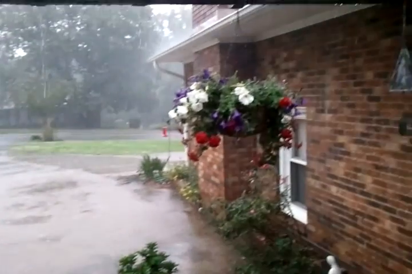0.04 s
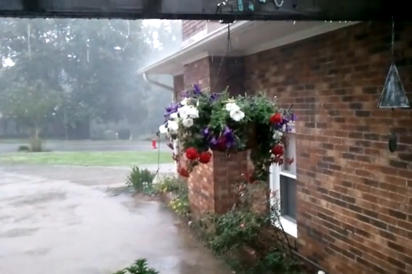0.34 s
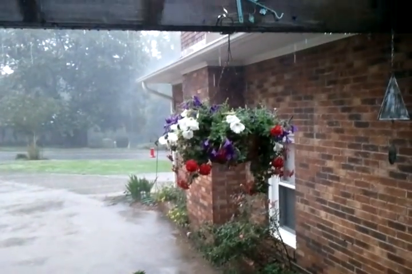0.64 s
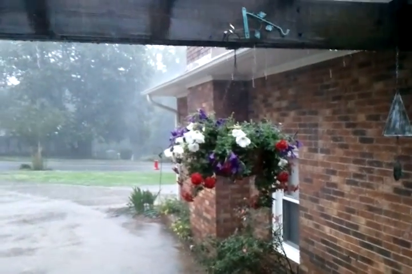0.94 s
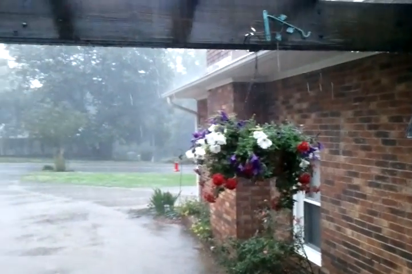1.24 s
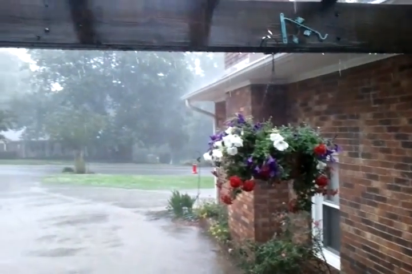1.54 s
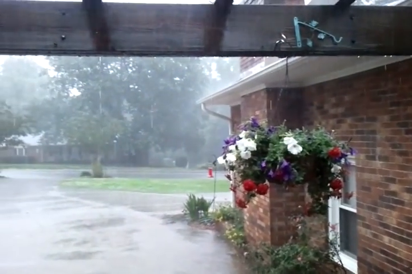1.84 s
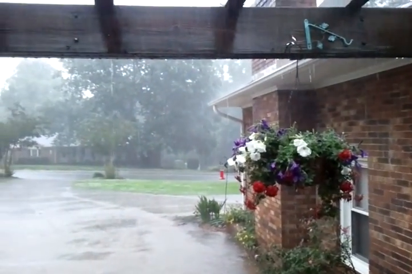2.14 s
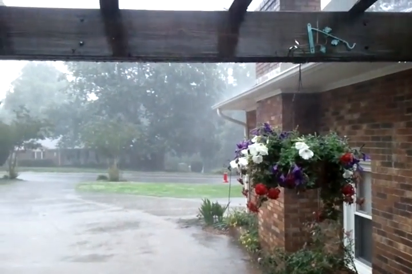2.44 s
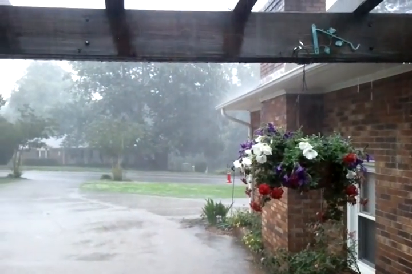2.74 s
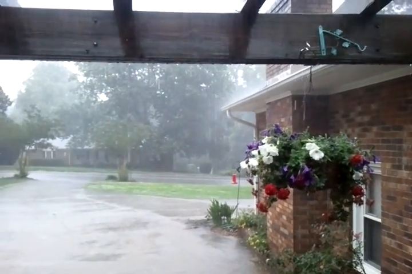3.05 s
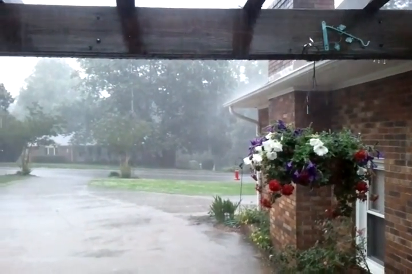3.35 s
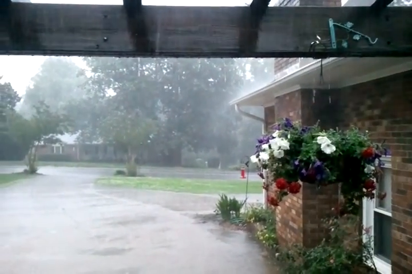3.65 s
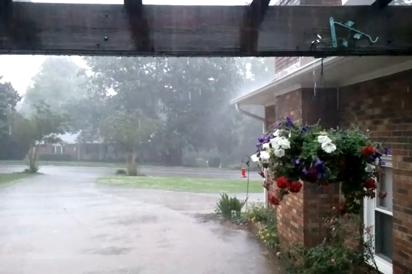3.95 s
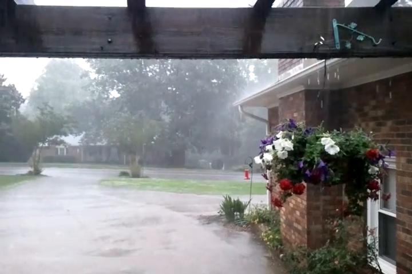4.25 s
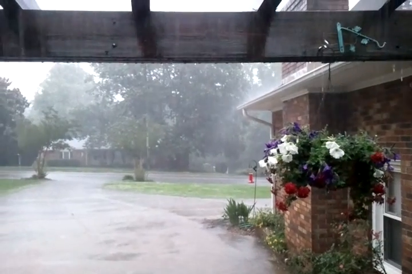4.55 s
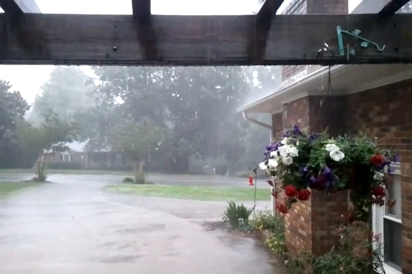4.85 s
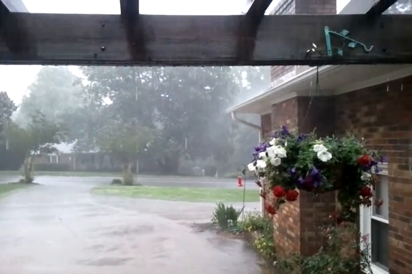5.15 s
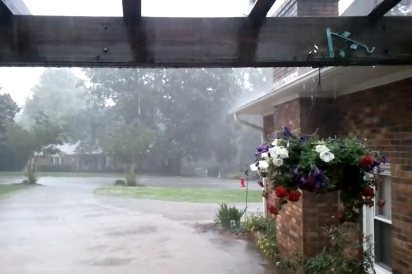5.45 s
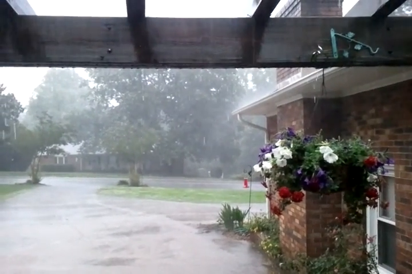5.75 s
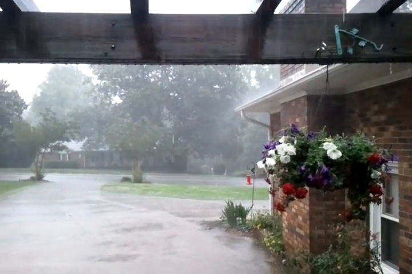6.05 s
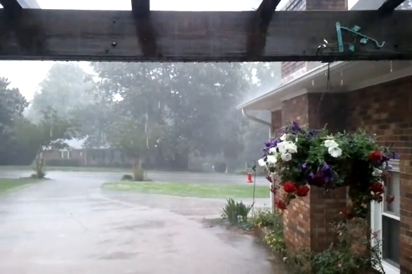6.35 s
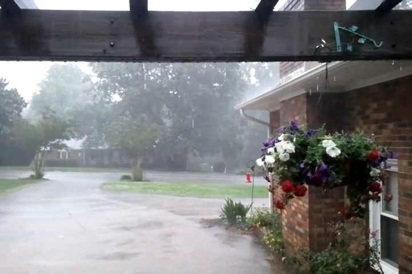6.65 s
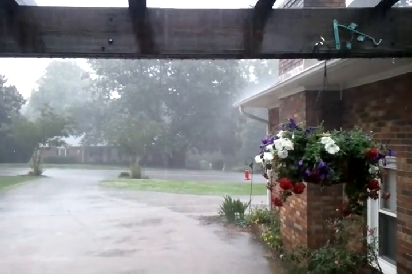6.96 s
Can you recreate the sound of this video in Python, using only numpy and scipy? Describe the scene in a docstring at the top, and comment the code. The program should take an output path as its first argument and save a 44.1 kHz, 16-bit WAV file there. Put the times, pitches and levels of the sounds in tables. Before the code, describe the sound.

Heavy rain pours on a driveway while long, deep thunder rolls swell and fade, and roof water splats close by.

```python
"""Thunder and heavy rain

Long thunder rolls swell and fade, heard from a porch beside a brick house; the porch booms along.
Water from the roof edge splats on the paving, near drops patter, and far ones merge into a wash
over the driveway and yard. The recorder's limiter turns the rain down under the biggest peals."""
import sys
import numpy as np
from scipy.fft import rfft, irfft, next_fast_len
from scipy.io import wavfile
from scipy.ndimage import uniform_filter1d, minimum_filter1d, map_coordinates

SR = 44100
rng = np.random.default_rng(int(sys.argv[2]) if len(sys.argv) > 2 else 0)


def unload_wav(signal):
    """Save mono or channel-first audio to the path in sys.argv[1] as 16-bit WAV at rate SR, clipped to [-1, 1]."""
    wavfile.write(
        sys.argv[1],
        SR,
        np.round(np.clip(np.atleast_2d(signal).T, -1, 1) * 32767).astype(np.int16),
    )


N = 318402

# Peals of thunder: (start [s], length [s], boom [dB], growl [dB], grumble [dB], porch drone [dB])
PEALS = [(-.06, .061, -11.5, -18, -15.5, -37), (0.088, 0.09, -34.5, -34, -24, -34),
         (0.324, .1, -20.5, -16, -21, -20), (0.415, 0.099, -28.5, -17, -20, -32),
         (0.598, .09, -25, -21, -23, -20.5), (0.74, 0.072, -23, -25, -40, -37),
         (1.17, 0.23, -27.5, -42, -41, -34), (1.443, 0.17, -23.5, -30.5, -30.5, -17),
         (1.557, 0.096, -17.5, -18.5, -22, -16), (1.719, 0.31, -16.5, -16, -19, -10),
         (2.068, .36, -16, -17.5, -21.5, -14), (2.504, .45, -15.5, -22, -25, -23),
         (2.82, 0.13, -17.5, -22.5, -29, -15), (2.975, .076, -20, -20.5, -35, -28),
         (3.107, .36, -19.5, -23, -28.5, -26), (3.54, .08, -16, -25.5, -33, -32),
         (3.646, .12, -22, -19.5, -23, -22.5), (3.834, 0.09, -16.5, -26, -26.5, -29),
         (3.998, 0.18, -20.5, -26, -40, -24), (4.298, .33, -26, -44, -33, -29.5),
         (4.996, 0.13, -21.5, -30, -36.5, -23.5), (5.144, 0.13, -19.5, -20.5, -26.5, -20),
         (5.234, .09, -17.5, -27, -30, -18.5), (5.337, 0.087, -12, -27.5, -20.5, -18),
         (5.495, .34, -17, -24.5, -25, -17), (5.919, 0.1, -13, -32, -30.5, -27),
         (6.17, 0.2, -21.5, -32, -32.5, -22.5), (6.504, .18, -17, -21.5, -24, -25.5),
         (6.617, 0.27, -19.5, -23, -28, -26.5), (6.8, .23, -19, -22, -24.5, -22.5),
         (7.064, .12, -11.5, -19, -17, -16)]
# The tone of three layers of thunder, from low to high: (frequency [Hz], level [dB])
BOOM_TONE = [(38, -31), (50, -14), (60, -10), (82, -3.5), (96, -1.5), (112, -20), (200, -43.5)]
GROWL_TONE = [(70, -26.5), (112, -7.5), (130, 5.5), (175, 1), (210, -8.5), (300, -18), (900, -54.5)]
GRUMBLE_TONE = [(130, -20), (195, 2), (240, 2), (300, -3.5), (400, -11), (550, -21.5), (900, -40.5),
                (2000, -72)]
def thunder_peals(drone_hz=107.2):
    """Crowds of shock waves from the lightning, dulled by distance, make the porch ring."""
    starts, lengths, boom_db, growl_db, grumble_db, drone_db = np.transpose(PEALS)
    boom = unit(coloured(shocks(), BOOM_TONE))
    porch_boom = unit(resonance(boom, hz=65.5, width_hz=9))
    boom = steadied(boom + amp(1.0) * porch_boom, span_s=0.066)
    # the porch's sharpest note rings so long that it is almost a pure tone
    drone = resonance(shocks(), drone_hz, width_hz=2.5)
    drone = steadied(resonance(drone, drone_hz, width_hz=4.6), span_s=0.1)
    growl = steadied(porch(coloured(shocks(), GROWL_TONE)), span_s=0.054)
    # nearer branches of the lightning keep more of their upper bass
    grumble = steadied(porch(coloured(shocks(), GRUMBLE_TONE)), span_s=0.15)
    # the floor is the distant echo left between peals
    layers = [(boom, boom_db, -27), (drone, drone_db, -33.5),
              (growl, growl_db, -30), (grumble, grumble_db, -31)]
    return sum(sound * surges(starts, lengths, levels_db, rise_s=0.044, fade_s=0.95, floor_db=floor_db)
               for sound, levels_db, floor_db in layers)


def shocks():
    """Shock waves arrive at random from all along the lightning's path."""
    return impacts(per_second=800, spread_db=3.5)


# The weaker, higher notes of the air in the porch: (pitch [Hz], width [Hz], level [dB])
PORCH_NOTES = [(121, 27, -4.5), (195, 22, -11.5), (243, 14, -4.5), (281, 17, -13.5)]
def porch(x):
    """The air in the porch adds its own ringing to a sound."""
    return x + sum(amp(db) * resonance(x, hz, width) for hz, width, db in PORCH_NOTES)


# Slow swells of the deepest thunder: (start [s], length [s], level [dB])
SWELLS = [(-.1, 0.37, -28.5), (0.758, 0.19, -32), (1.501, 0.39, -22.5), (1.881, 0.67, -20.5),
          (2.55, .85, -22.5), (3.555, .7, -25.5), (5.149, .45, -27), (5.751, 0.19, -21.5),
          (6.205, 1.3, -29.5)]
# Their tone: (frequency [Hz], level [dB])
RUMBLE_TONE = [(6, -13), (12, -17.5), (24, -6.5), (42, 3), (54, -2), (90, -42)]
def deep_rumble():
    """The lowest part of the shock waves rises and falls slowly under the peals."""
    rumble = steadied(coloured(shocks(), RUMBLE_TONE), span_s=0.13)
    return rumble * surges(*np.transpose(SWELLS), rise_s=0.22, fade_s=1.2, floor_db=-33.5)


# Deep rolls of thunder: (start [s], length [s], pitch [Hz], level [dB])
ROLLS = [(0.598, 0.079, 66.5, -14.5), (1.681, 0.14, 63.5, -11.5), (1.893, 0.22, 63.95, -13.5),
         (2.225, 0.31, 68.75, -17.5), (2.874, 0.079, 69.8, -16), (3.001, 0.038, 61.15, -7),
         (3.171, 0.083, 61.8, -15.5), (5.293, 0.21, 64.7, -15), (5.6, 0.078, 61.6, -12.5),
         (5.94, 0.16, 84.3, -15), (6.799, 0.086, 65.7, -24), (7.097, 0.15, 64.7, -11)]
def thunder_rolls():
    """Now and then the shock waves fall into step on one low note."""
    return placed((start, db, roll(length, hz)) for start, length, hz, db in ROLLS)


def roll(length_s, hz, wander=0.82, rise_s=0.02, fade_s=0.46):
    """One low, slightly wavering note swells, holds and dies away."""
    t = np.arange(SR) / SR
    drift = wander * np.cumsum(rng.standard_normal(SR)) / np.sqrt(SR)
    note = unit(np.sin(2 * np.pi * (hz * t + rng.random()) + drift))
    return note * np.minimum(t / rise_s, 1) * fade(t, length_s, fade_s)


# Big gobs of falling water: (time [s], level [dB], pitch [Hz], fade time [s], pouring time [s])
BIG_SPLATS = [(.028, -22.5, 1880, 0.08, 0.011), (.0650, -22.5, 3180, 0.095, 0.0074),
              (.226, -23.5, 2280, .06, .008), (.765, -26, 1740, .2, 0.037),
              (1.5649, -16.5, 2910, .15, .019), (1.566, -25, 5660, 0.095, .023),
              (1.8366, -23, 3220, 0.086, .004), (2.0745, -23, 4850, .13, 0.011),
              (2.134, -27, 2170, .078, .006), (2.169, -22, 3930, 0.16, 0.0062),
              (2.4981, -22.5, 3490, .07, .004), (2.724, -22.5, 5100, .058, 0.0046),
              (2.888, -19.5, 6010, .086, 0.0081), (2.9714, -12.5, 4140, .03, 0.0013),
              (2.975, -19.5, 5160, .015, .032), (3.385, -25.5, 2050, 0.12, 0.022),
              (3.685, -27, 2200, 0.1, .008), (3.7925, -16, 1890, 0.07, 0.0043),
              (3.797, -16.5, 6020, .04, .005), (3.808, -20.5, 1910, 0.08, .004),
              (3.849, -27.5, 1700, .08, .004), (5.215, -23.5, 2150, 0.087, .008),
              (5.412, -21, 2910, 0.11, 0.0066), (5.669, -23, 3560, .08, 0.014),
              (6.011, -19, 5830, 0.045, 0.0086), (7.047, -21, 2330, .06, 0.0074)]
def roof_splats(small_count=110):
    """Water falls off the roof edge in big splats, with many small ones at random."""
    when, size, pitch, life = rng.random((small_count, 4)).T
    level_db = -35.5 + 4 * (size - .5)
    pitch_hz = 1200 * 5 ** pitch
    fade_s = 0.2 * (.5 + life)
    pour_s = np.full(small_count, 0.004)
    small = list(zip(when * N / SR, level_db, pitch_hz, fade_s, pour_s))
    return placed((start, db, splat(*shape)) for start, db, *shape in BIG_SPLATS + small)


def splat(hz, fade_s, pour_s, slap=2.2, grit_db=2.0):
    """A gob slaps the paving and pours for a moment; its droplets fall back in a dying crackle."""
    t = np.arange(SR // 4) / SR
    noise, sizes = rng.standard_normal((2, len(t)))
    droplets = noise * amp(grit_db * unit(uniform_filter1d(sizes, size=60)))
    width_hz = 0.66 * hz
    crackle = unit(resonance(resonance(droplets, hz, width_hz), hz, width_hz))
    return crackle * fade(t, pour_s, fade_s) + slap * tap(hz)


def tap(hz, cycles=2.5):
    """Water hits a hard surface with a tick that dies within a few vibrations."""
    t = np.arange(SR // 4) / SR
    return np.sin(2 * np.pi * hz * t) * np.exp(-t * hz / cycles)


# Single drops close to the porch: (time [s], level [dB], pitch [Hz])
DRIPS = [(.0403, -15, 2100), (.4521, -13, 3880), (.9804, -15.5, 3020), (1.2195, -16, 5300),
         (1.571, -8, 2400), (1.5805, -9.5, 3400), (1.7305, -15, 2500), (3.1062, -16, 2550),
         (3.502, -10.5, 5230), (3.7958, -7.5, 5040), (3.8168, -3, 5980), (3.9987, -15.5, 2600),
         (4.186, -13.5, 3820), (5.6194, -8.5, 2200), (6.011, -11.5, 4520), (7.0536, -8.5, 2510),
         (7.117, -12, 4570)]
def drips(spatter_db=-14):
    """Each close drop taps and throws a brief spatter."""
    return placed((start, db, tap(hz) + amp(spatter_db) * splat(hz, fade_s=0.019, pour_s=0, slap=0))
                  for start, db, hz in DRIPS)


# How hard it rains: (time [s], wash level [dB], spray level [dB])
RAIN_STRENGTH = [(0, -22.5, -24.5), (.25, -22, -23.5), (.42, -25.5, -25.5), (.55, -23, -24),
                 (.8, -22.5, -25), (1.05, -24, -25.5), (1.22, -24.5, -23), (1.5, -24, -26.5),
                 (1.95, -22.5, -24), (2.2, -19, -19.5), (2.42, -22.5, -23), (2.6, -20, -21),
                 (2.75, -22, -22), (2.92, -22.5, -21), (3.12, -21.5, -22), (3.28, -21, -22.5),
                 (3.4, -22, -23.5), (3.52, -24.5, -22.5), (3.7, -22, -22.5), (3.85, -21.5, -21.5),
                 (4.0, -21, -23), (4.17, -24, -25), (4.4, -24, -24.5), (4.55, -23, -23), (4.7, -24.5, -24),
                 (5.1, -24, -25.5), (5.33, -23, -22), (5.55, -20, -23), (5.7, -23, -23.5),
                 (5.87, -21.5, -24), (6.08, -22.5, -22.5), (6.26, -21.5, -21), (6.36, -24, -25),
                 (6.55, -25.5, -24), (6.68, -22, -21.5), (6.85, -22, -22.5), (7.02, -22, -22),
                 (7.22, -21, -22)]
# The tone of the dull wash and the bright spray: (frequency [Hz], level [dB])
WASH_TONE = [(100, -6), (300, 0), (600, -7), (1000, -5.5), (1500, -5), (2300, -4.5), (2900, -9),
             (4000, -14.5), (6000, -18.5), (7400, -37)]
SPRAY_TONE = [(800, -22), (2000, -18), (3000, 0.5), (3800, 0.5), (4800, -1), (5900, 0.5), (6400, -1),
              (7400, -4)]
def rain():
    """Countless far drops merge into a wash; nearer ones patter in uneven flurries."""
    wash_db, spray_db = curves(RAIN_STRENGTH)
    flurry_db = 0.54 * wobble(45)  # wash and spray flicker together
    far = unit(coloured(rng.standard_normal(N), WASH_TONE))
    near = unit(coloured(impacts(per_second=1100, spread_db=3.0), WASH_TONE))
    wash = unit(far + amp(-6.0) * near) * amp(flurry_db + 0.28 * wobble(50))
    mist = unit(coloured(rng.standard_normal(N), SPRAY_TONE))
    ticks = unit(coloured(impacts(per_second=1600, spread_db=4.5), SPRAY_TONE))
    spray = unit(mist + amp(-5.5) * ticks) * amp(0.97 * flurry_db + 1.1 * wobble(55))
    return amp(wash_db) * wash + amp(spray_db) * spray


def amp(db):
    """Turn decibels into a number to multiply by."""
    return 10 ** (np.asarray(db) / 20)


def unit(x):
    """Scale a sound to an average strength (rms) of 1."""
    return x / np.sqrt(np.mean(x ** 2) + 1e-20)


def curves(rows):
    """Join a table's points with lines: one curve for each column after the time."""
    times, *columns = np.transpose(rows)
    return [np.interp(np.arange(N) / SR, times, column) for column in columns]


def wobble(per_second):
    """A smooth curve through evenly spaced random values."""
    points = rng.standard_normal(int(N * per_second / SR) + 4)
    return map_coordinates(points, [np.arange(N) * per_second / SR])


def impacts(per_second, spread_db):
    """Clicks of random size at random times."""
    happens = rng.random(N) < per_second / SR
    size_db = spread_db * np.minimum(rng.standard_normal(N), 2.5)
    sign = rng.choice([-1, 1], N)
    return unit(happens * sign * amp(size_db))


def filtered(x, response):
    """Multiply each frequency in a sound by response(frequency)."""
    padded = next_fast_len(len(x) * 5 // 4)
    hz = np.fft.rfftfreq(padded, 1 / SR)
    return irfft(rfft(x, padded) * response(hz), padded)[:len(x)]


def coloured(x, tone):
    """Shape a sound's bass and treble with a tone table."""
    points_hz, db = np.transpose(tone)
    return filtered(x, lambda hz: amp(np.interp(np.log(hz + 1), np.log(points_hz), db)))


def resonance(x, hz, width_hz):
    """Make a sound ring at one pitch; a smaller width rings longer."""
    return filtered(x, lambda f: 1j * f * width_hz / (hz * hz - f * f + 1j * f * width_hz))


def steadied(x, span_s):
    """Even out a sound so its strength stays near 1 over each span."""
    size = max(int(span_s * SR), 2)
    x = unit(x)
    power = uniform_filter1d(uniform_filter1d(x ** 2, size), size)
    return x / np.sqrt(np.abs(power) + 1e-3)


def fade(t, hold_s, fade_s):
    """Stay at full volume for hold_s, then drop 60 dB every fade_s."""
    return amp(-60 * np.maximum(t - hold_s, 0) / fade_s)


def surges(starts, lengths, levels_db, rise_s, fade_s, floor_db):
    """A volume curve: surges rise, hold and fade, adding their power to a steady floor."""
    t = np.arange(0, N, 64) / SR
    age = t - starts[:, None]
    each = amp(levels_db[:, None]) * np.clip(age / rise_s, 0, 1) * fade(age, lengths[:, None], fade_s)
    power = amp(floor_db) ** 2 + np.sum(each ** 2, axis=0)
    return np.interp(np.arange(N) / SR, t, np.sqrt(power))


def placed(events):
    """Mix events given as (time [s], level [dB], sound)."""
    mix = np.zeros(N + 2 * SR)
    for start, db, sound in events:
        mix[max(round(start * SR), 0):][:len(sound)] += amp(db) * sound
    return mix[:N]


def scene():
    """Thunder and falling water, mixed into one channel."""
    thunder = thunder_peals() + deep_rumble() + thunder_rolls()
    return (thunder + roof_splats() + drips() + rain())[None]


def limiter(x, ceiling_db=-3.0, hold_s=0.0095, recovery_db_per_s=70):
    """Peaks over the ceiling pull the whole sound down; the volume then creeps back."""
    size = int(hold_s * SR)
    needed_db = np.minimum(0, ceiling_db - 20 * np.log10(np.abs(x) + 1e-9))
    held_db = minimum_filter1d(needed_db, size)
    recovery_db = recovery_db_per_s * np.arange(N) / SR
    gain_db = np.minimum.accumulate(held_db - recovery_db) + recovery_db
    return x * amp(uniform_filter1d(gain_db, size))


# How the microphone loses treble: (frequency [Hz], level [dB])
MICROPHONE_TONE = [(6200, 0.5), (6600, -1.5), (7000, -6.5), (7300, -14.5), (7500, -26.5)]
def record(dry, top_hz=7480):
    """A small mono recorder dulls the treble, holds down peaks and cuts off the highest sounds."""
    sound = limiter(coloured(dry[0], MICROPHONE_TONE))
    return filtered(sound, lambda hz: hz < top_hz)[None]


dry = scene()
out = record(dry)
unload_wav(out)
```